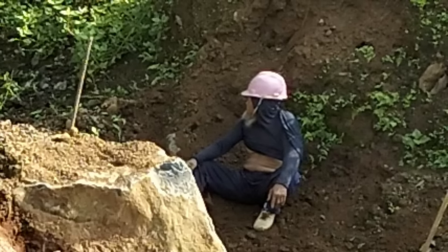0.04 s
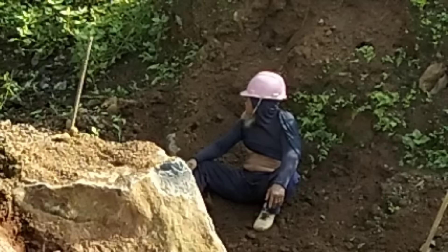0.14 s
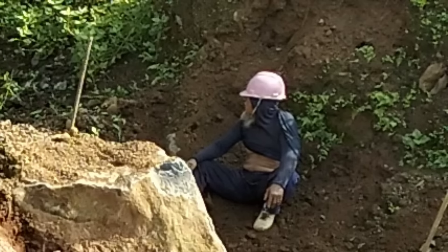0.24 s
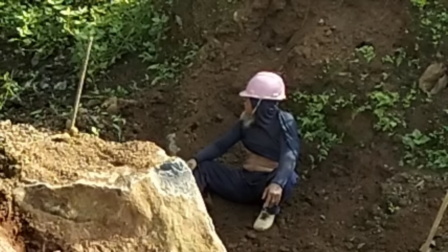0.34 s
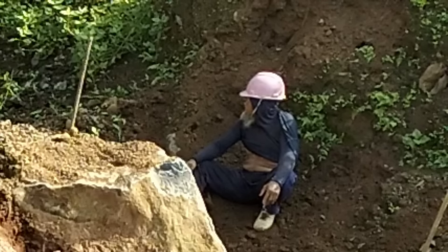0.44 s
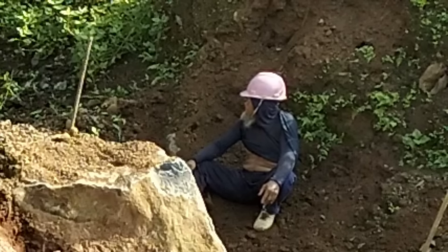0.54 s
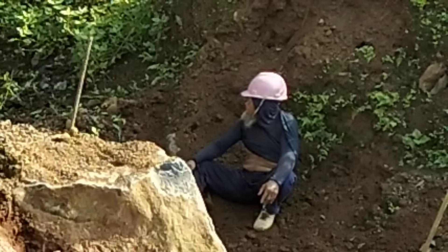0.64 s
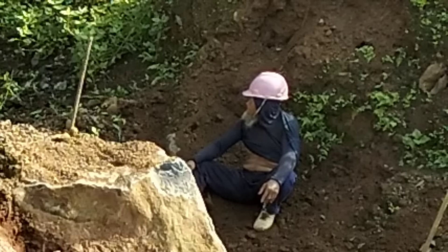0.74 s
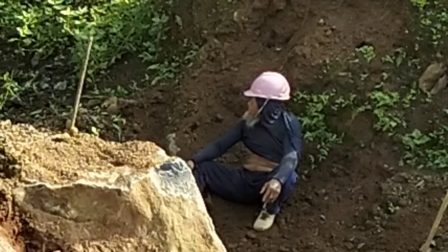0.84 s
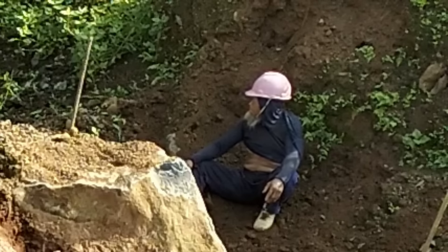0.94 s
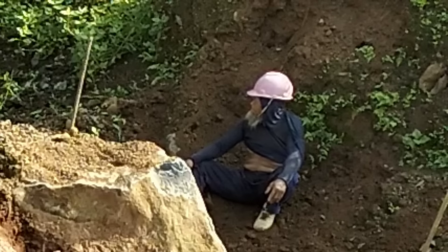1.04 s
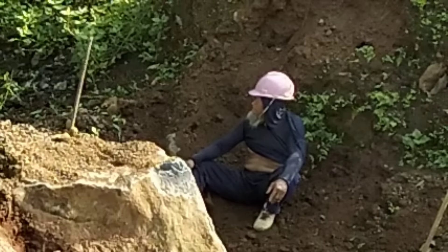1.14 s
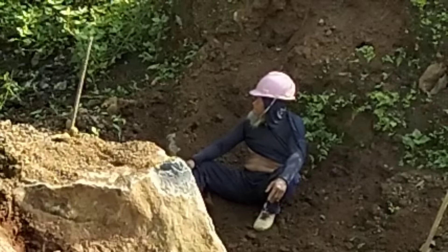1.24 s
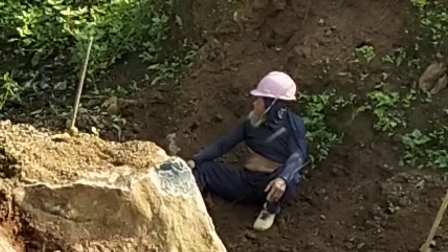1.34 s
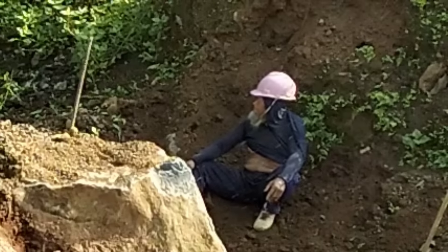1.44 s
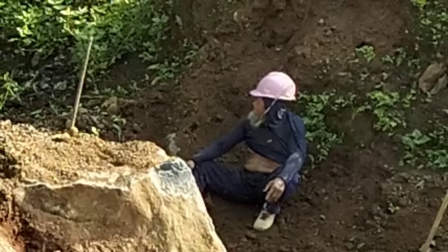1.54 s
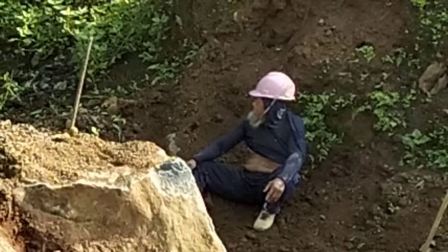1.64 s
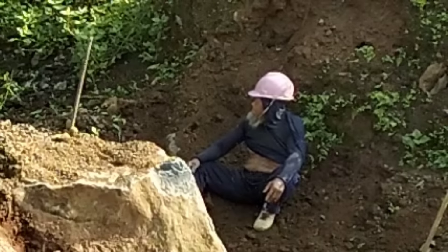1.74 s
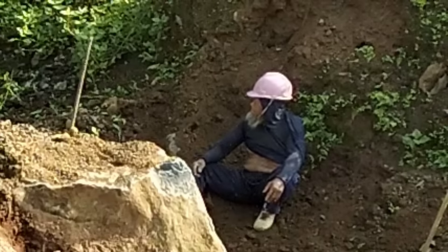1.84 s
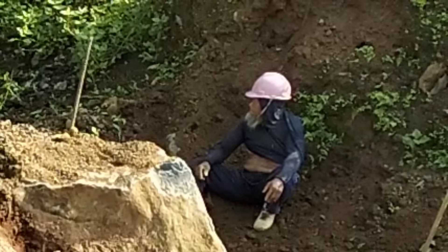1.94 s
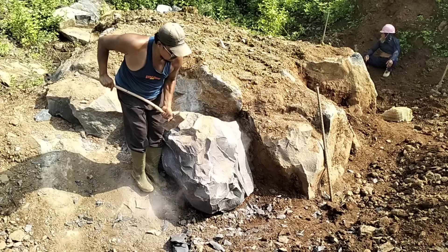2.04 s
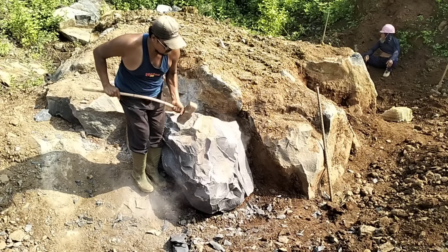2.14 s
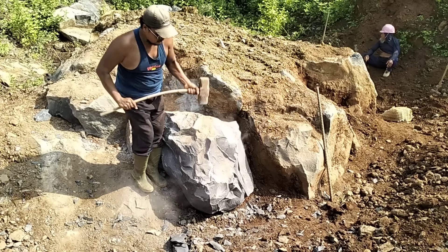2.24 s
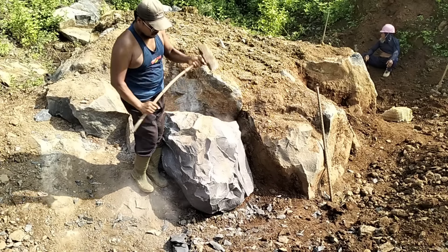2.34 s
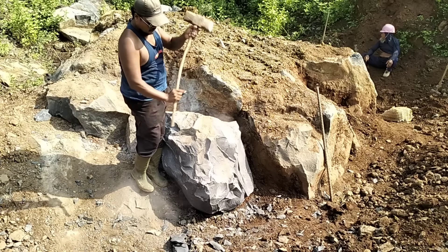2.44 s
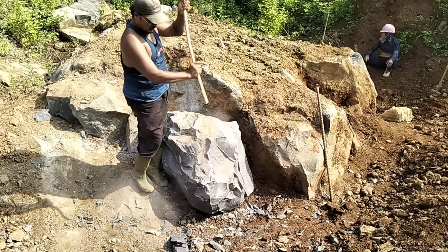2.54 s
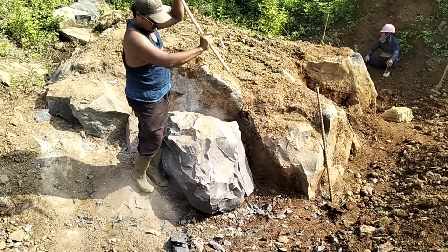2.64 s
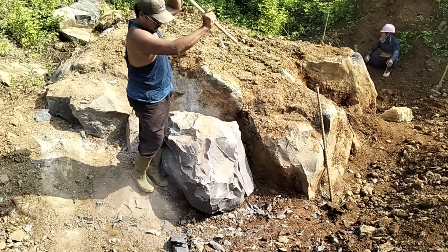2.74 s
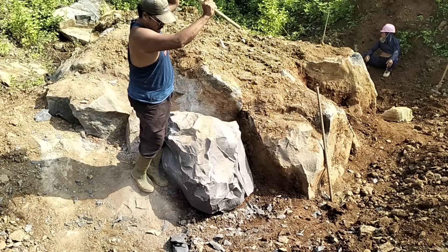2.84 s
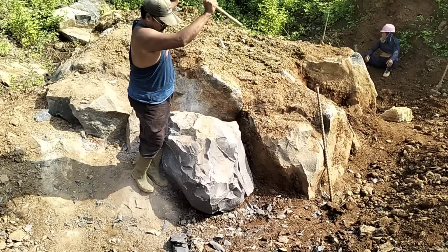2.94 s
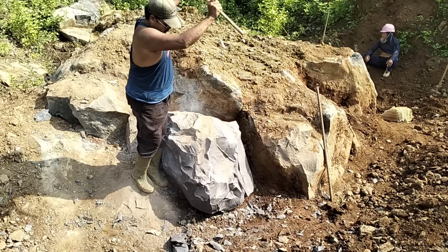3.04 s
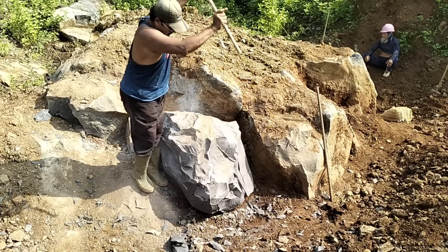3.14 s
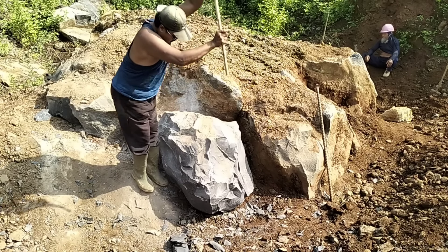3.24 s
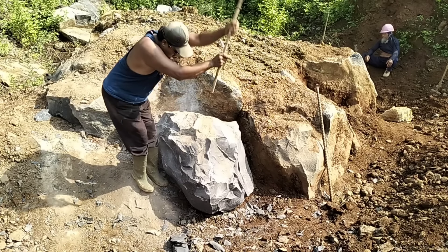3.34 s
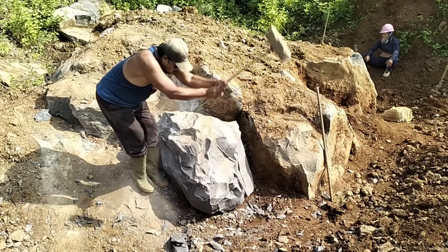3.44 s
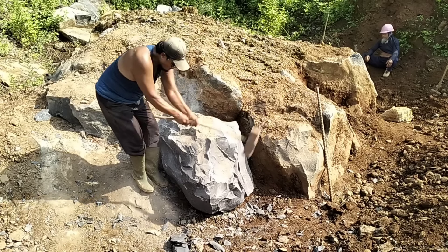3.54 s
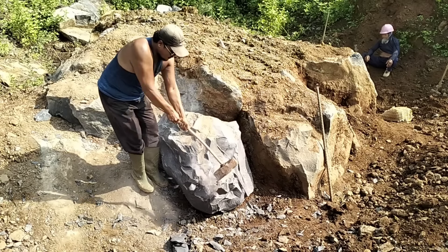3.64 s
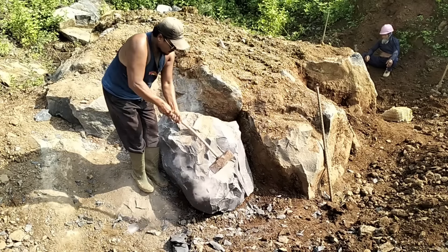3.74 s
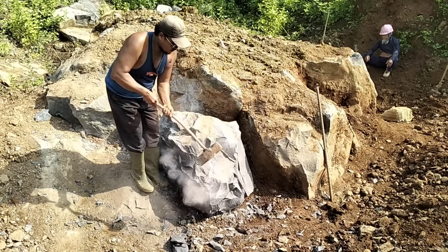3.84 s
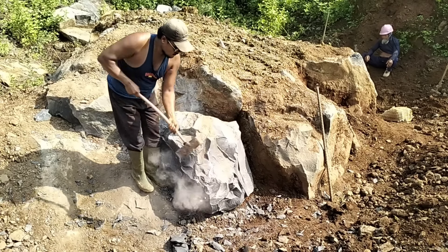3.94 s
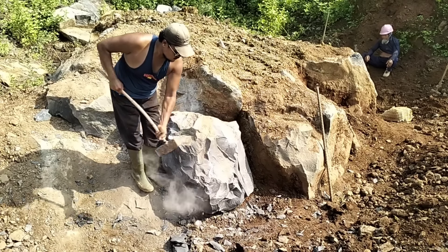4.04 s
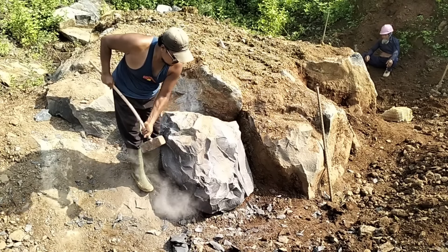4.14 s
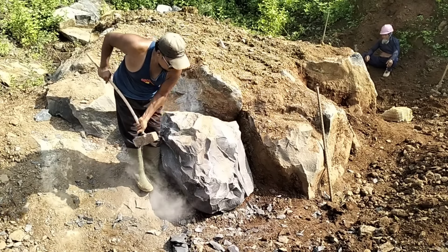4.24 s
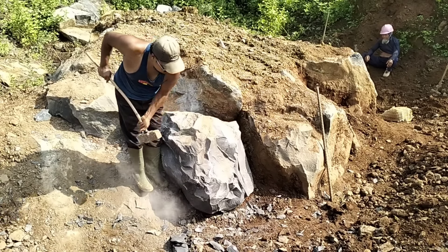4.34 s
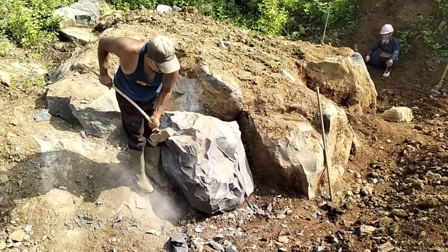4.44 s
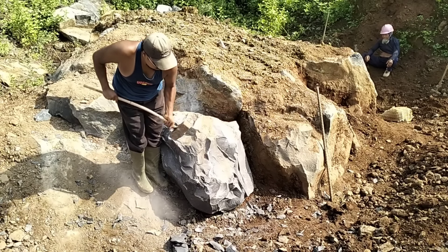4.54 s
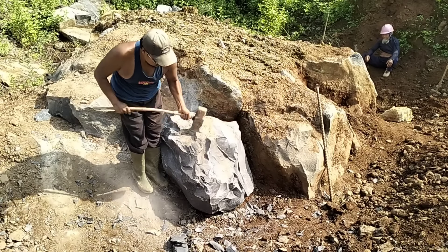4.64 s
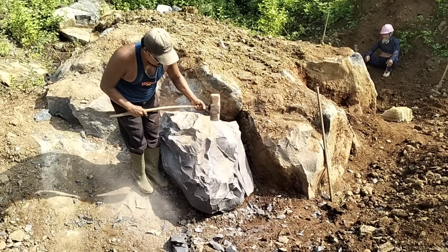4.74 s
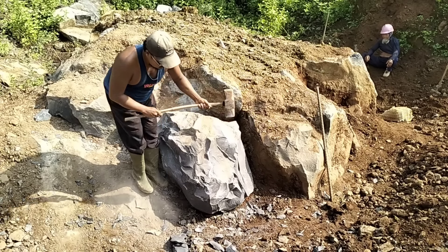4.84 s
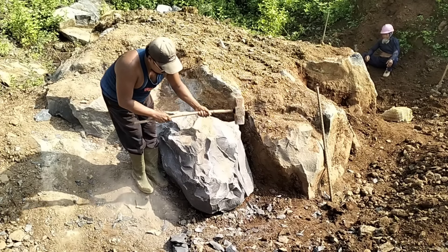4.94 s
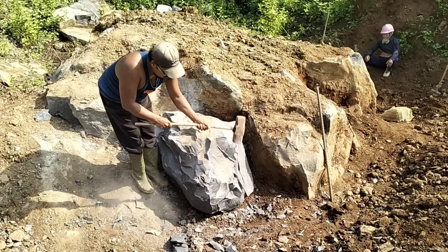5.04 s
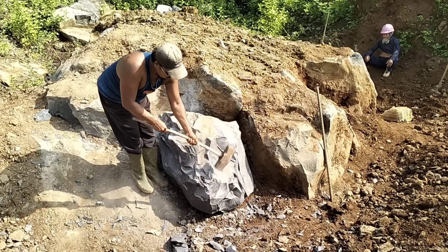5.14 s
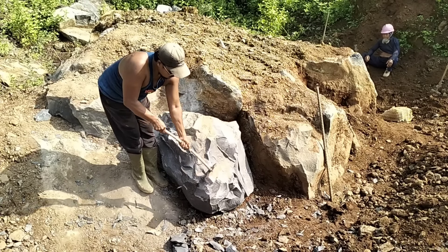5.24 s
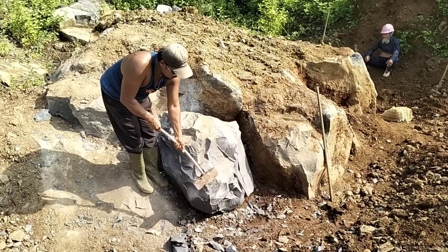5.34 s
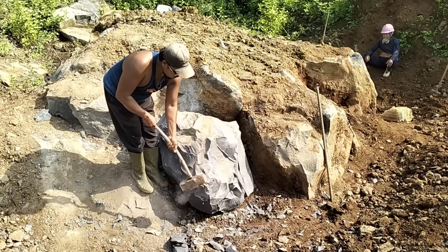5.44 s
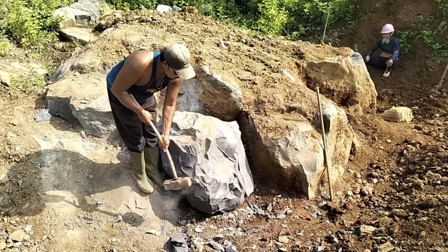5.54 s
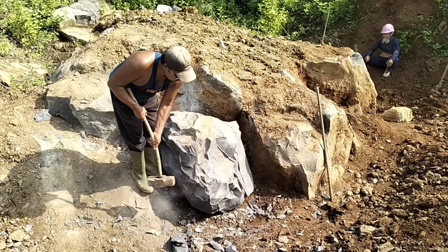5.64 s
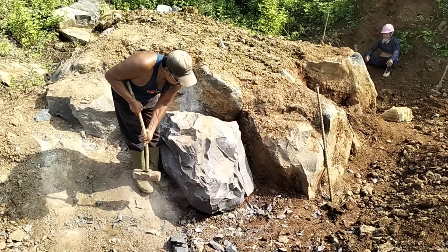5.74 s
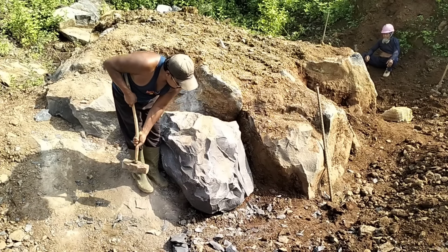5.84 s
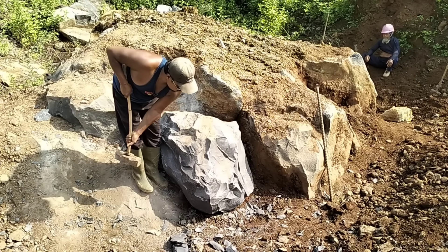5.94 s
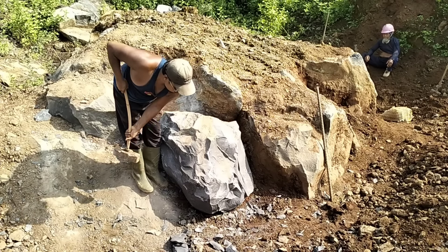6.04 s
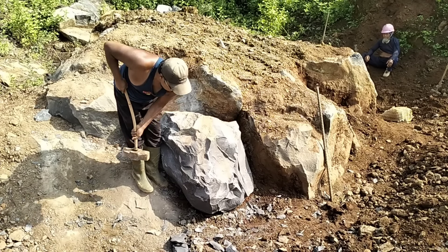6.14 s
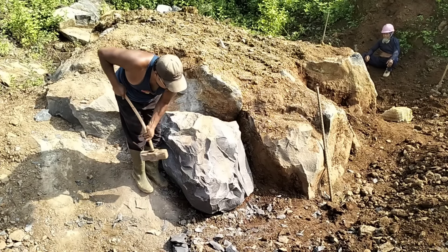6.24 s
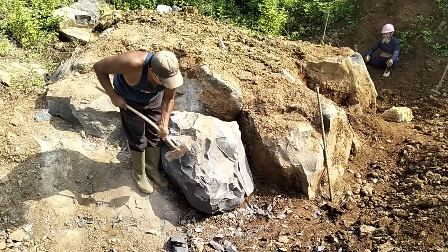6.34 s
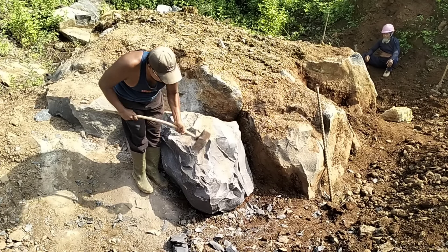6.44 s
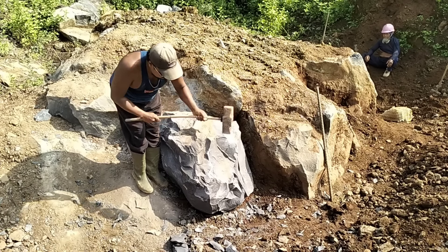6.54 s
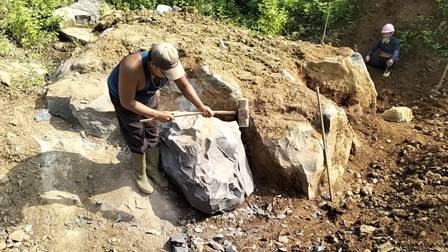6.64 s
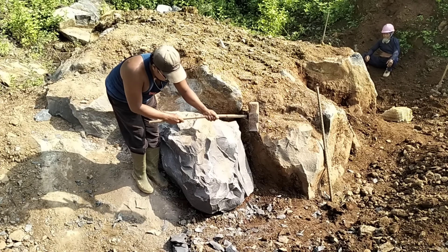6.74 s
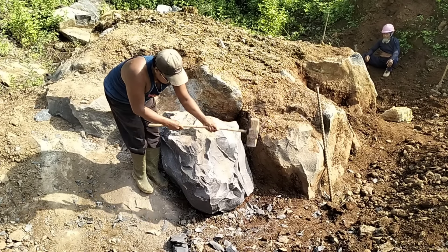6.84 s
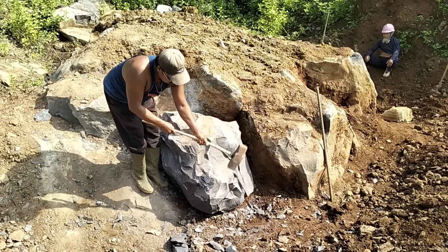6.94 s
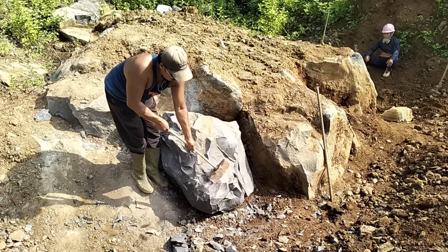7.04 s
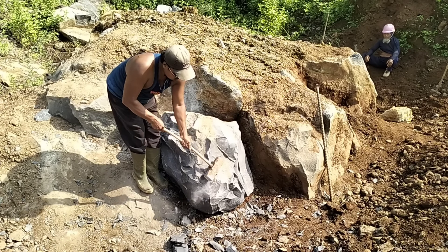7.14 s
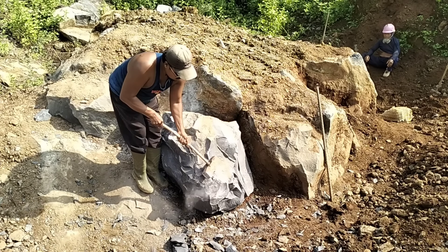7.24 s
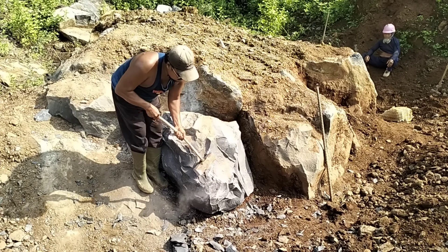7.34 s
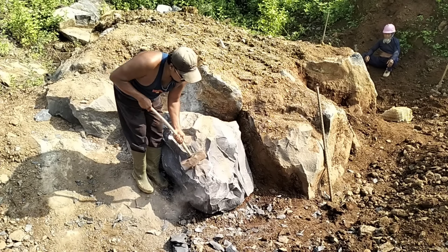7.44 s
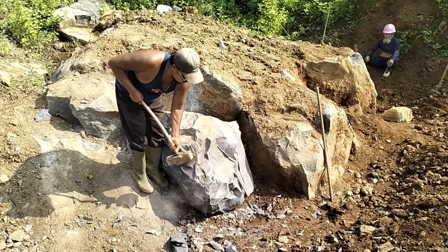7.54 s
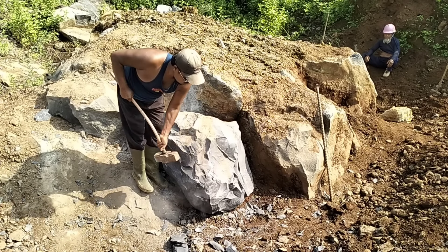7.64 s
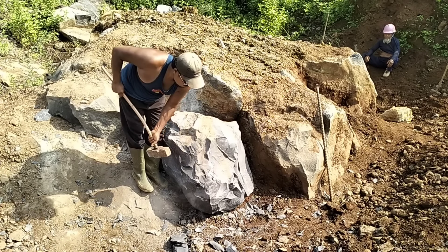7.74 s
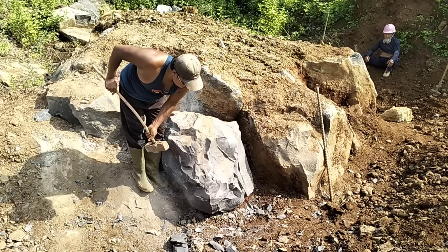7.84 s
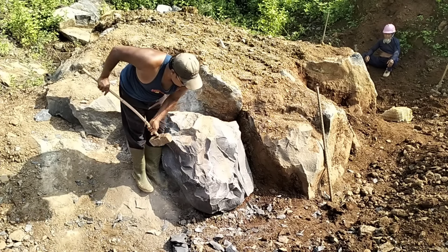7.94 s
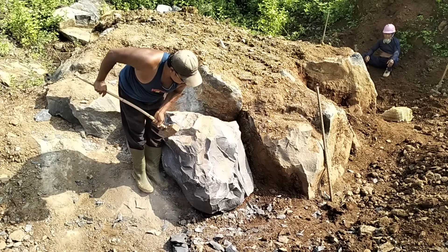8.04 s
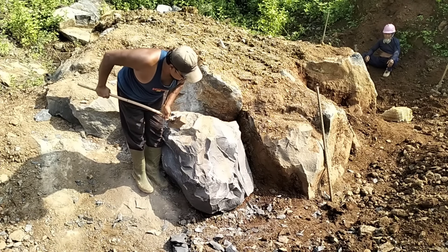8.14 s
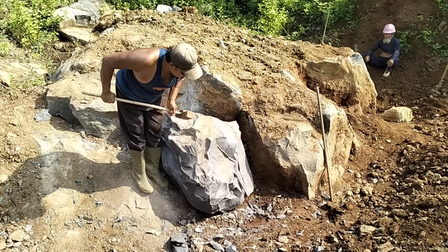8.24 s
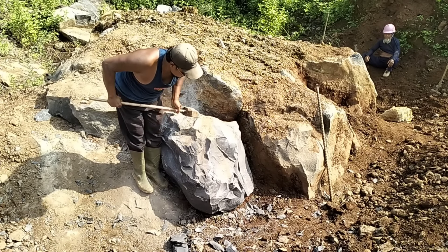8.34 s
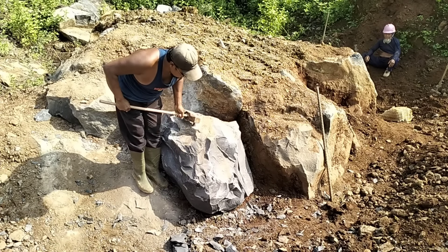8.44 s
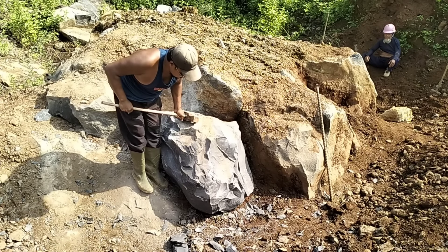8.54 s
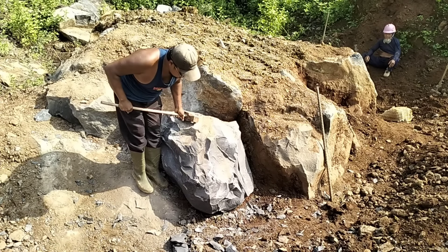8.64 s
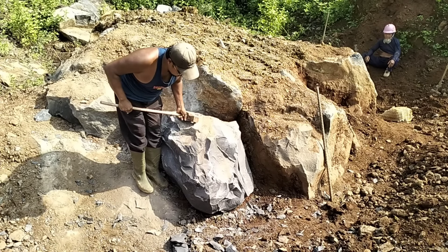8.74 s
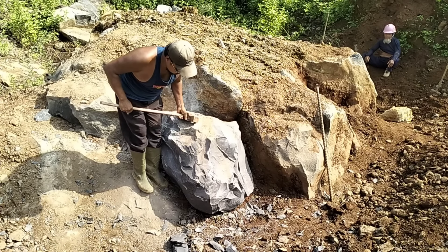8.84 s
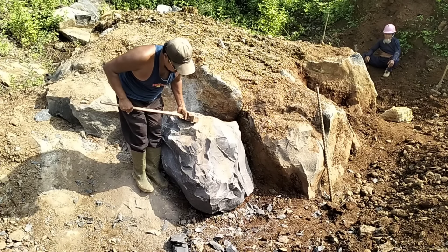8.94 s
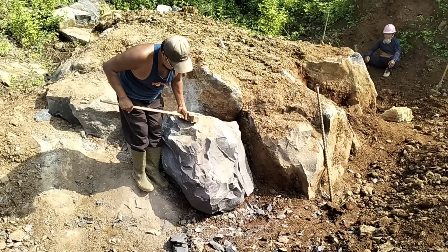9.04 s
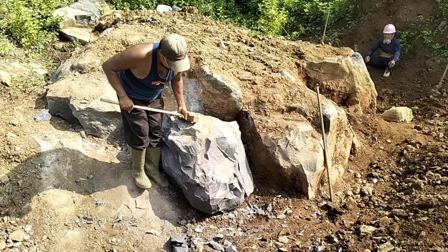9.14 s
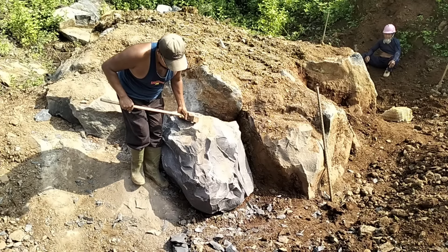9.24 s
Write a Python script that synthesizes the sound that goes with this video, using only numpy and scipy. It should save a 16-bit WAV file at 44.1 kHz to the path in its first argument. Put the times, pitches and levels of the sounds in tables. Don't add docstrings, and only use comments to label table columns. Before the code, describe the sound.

Six sharp sledgehammer blows crack a boulder in an open earth pit, debris rattling after, over steady high insect hiss and a faint bird.

```python
import sys
import numpy as np
from scipy import signal
from scipy.fft import rfft, irfft, next_fast_len
from scipy.io import wavfile
from scipy.ndimage import uniform_filter1d, map_coordinates

SR = 44100
rng = np.random.default_rng(int(sys.argv[2]) if len(sys.argv) > 2 else 0)


def volts_from_db(level):
    exponent = np.asarray(level, float) / 20
    return 10 ** exponent


def transcribe(signal):
    frames = np.atleast_2d(signal).T
    limited = np.clip(frames, -1, 1)
    pcm = np.round(limited * 32767).astype(np.int16)
    wavfile.write(sys.argv[1], SR, pcm)


N = 409688


def unit(x):
    return x / np.sqrt(np.mean(x ** 2) + 1e-20)


def along(points, hz):
    f, v = np.transpose(points)
    return np.interp(np.log(hz + 1), np.log(f + 1), v)


def curves(rows):
    s, *cols = np.transpose(rows)
    return [np.interp(np.arange(N) / SR, s, c) for c in cols]


def wobble(rate):
    knots = rng.standard_normal(int(N * rate / SR) + 4)
    return map_coordinates(knots, [np.arange(N) * rate / SR])


def filtered(x, response):
    n = x.shape[-1]
    m = next_fast_len(n + 8192)
    return irfft(rfft(x, m) * response(np.fft.rfftfreq(m, 1 / SR)), m)[..., :n]


def add(track, s, x):
    part = track[..., round(s * SR):][..., :x.shape[-1]]
    part += x[..., :part.shape[-1]]


def ring(modes, t, attack, lag=0):
    tones = sum(volts_from_db(db - 60 * t / t60) * np.sin(2 * np.pi * hz * t - lag) for hz, db, t60 in modes)
    return tones * (1 - np.exp(-t / attack))


def after_blows(shape, rows):
    t = np.arange(N) / SR
    return sum((t > s) * shape(np.maximum(t - s, 0), row) for (s, *_), row in zip(BLOWS, rows))


# (f/Hz, correlation -1..1)
LIKENESS = [(60, 0.84), (130, 0.92), (290, 0.22), (640, -0.013), (1390, -0.35), (3060, 0.21),
            (6720, -0.092), (14800, 0.094)]


def rush(spectrum, patchy_db):
    z = signal.stft(rng.standard_normal((2, N)), nperseg=512)[2]
    field = uniform_filter1d(rng.standard_normal(z.shape[1:]), size=8, axis=0)
    field = uniform_filter1d(field, size=6, axis=1)
    pair = signal.istft(z * volts_from_db(patchy_db * unit(field)), nperseg=512)[1][:, :N]

    def spread(hz):
        turn = np.arccos(np.clip(along(LIKENESS, hz), -1, 1)) / 2
        return volts_from_db(along(spectrum, hz)) * [np.cos(turn), np.sin(turn)]

    mid, side = filtered(pair, spread)
    return unit(np.array([mid + side, mid - side]))


# (f/Hz, t60/s)
PIT_DECAY = [(100, 0.76), (500, 0.12), (2000, 0.15), (8000, 0.21)]


def pit(x):
    hz, t, z = signal.stft(rng.standard_normal((2, SR // 2)), SR, nperseg=256)
    tail = signal.istft(z * volts_from_db(-60 * t / along(PIT_DECAY, hz)[:, None]), SR, nperseg=256)[1]
    return signal.fftconvolve(np.pad(x, (400, 0))[None], tail / np.linalg.norm(tail[0]), axes=1)


# (f/Hz, level/dB per Hz)
LOW_CHORUS = [(1120, -54), (1900, -21.5), (2370, -8), (2580, -5.5), (2790, -1), (3440, -2), (4700, 1.5),
              (5610, -1), (6820, -1.5), (7670, -9.5), (8200, -6.5), (10700, -37.5), (18000, -120)]
# (f/Hz, level/dB per Hz)
HIGH_CHORUS = [(4470, -31.5), (7600, -10), (8080, -10.5), (9530, 2), (11200, -0.5), (12600, -5.5),
               (14400, -14), (14800, -34), (14900, -66.5), (15200, -75)]
# (t/s, level/dB)
SWELLS = [(0, -35.5), (.22, -35.5), (.5, -33), (.85, -34.5), (1.25, -33), (2.0, -34), (2.9, -32),
          (3.35, -33.5), (3.62, -32), (4.5, -31.5), (4.8, -33.5), (5.2, -32), (6.4, -33.5), (6.8, -33.5),
          (7.6, -31.5), (8.05, -35), (8.55, -33), (9.29, -34)]


def insects():
    high_db, = curves(SWELLS)
    low_db = -31 + 0.16 * (high_db - high_db.mean()) + 0.26 * wobble(2.5)
    throb = np.sin(2 * np.pi * np.cumsum(24.5 + 2.0 * wobble(3.1)) / SR)
    low = volts_from_db(low_db + 0.43 * wobble(30)) * rush(LOW_CHORUS, patchy_db=0.85)
    high = volts_from_db(high_db + .9 * throb + 0.21 * wobble(40)) * rush(HIGH_CHORUS, patchy_db=1.46)
    return low * volts_from_db([[-.1], [.1]]) + high * volts_from_db([[-1.3], [1.3]])


# (f/Hz, level/dB per Hz)
RUMBLE_TONE = [(12, -62.5), (20, -31), (29, -12), (42, -19), (59, -2), (91, -7), (130, -1), (300, -30.5),
               (390, -54.5), (660, -120)]
# (t/s, level/dB)
DISTANT = [(0, -52.5), (.45, -55), (.75, -52), (1.6, -52), (2.3, -51.5), (3.4, -52.5), (5.2, -52),
           (5.7, -56.5), (6.05, -54), (7.9, -57.5), (9.29, -56)]
# t/s, length/s, level/dB
ROLL = (7.27, 0.29, -45)


def rumble():
    distant_db, = curves(DISTANT)
    s, length, db = ROLL
    place = (np.arange(N) / SR - s) / length
    roll = volts_from_db(db) * np.clip(1.6 - np.abs(place * 3.0 - 1.6), 0, 1)
    return (volts_from_db(distant_db) + roll) * volts_from_db(2.2 * wobble(4)) * rush(RUMBLE_TONE, patchy_db=0.5)


# (f/Hz, level/dB per Hz)
AIR_TONE = [(130, -31.5), (220, -4.5), (308, -4), (425, -6.5), (884, -8.5), (978, -8.5), (1650, -7.5),
            (2140, -34), (3630, -120)]
# (level/dB, t60/s)
DUST = [(-51.5, 0.73), (-45, 1.3), (-56, 0.7), (-52.5, 0.91), (-47, 0.65), (-67, .8)]
# (centre t/s, length/s, level/dB)
STIRS = [
    (1.153, 0.359, -66),
    (1.896, 0.65, -65.5),
    (6.028, 0.22, -64),
]


def air():
    t = np.arange(N) / SR
    dust = after_blows(lambda since, row: volts_from_db(row[0] - 60 * since / row[1]), DUST)
    breeze = sum(volts_from_db(db) * np.exp(-(2.8 * (t - s) / length) ** 2) for s, length, db in STIRS)
    level = volts_from_db(-61 + 1.1 * wobble(3)) + dust + breeze
    return level * volts_from_db(1.2 * wobble(23)) * rush(AIR_TONE, patchy_db=4)


# (t/s, length/s, level/dB)
TRILL = [(.68, .045, -56), (.72, .05, -54), (.768, .06, -52), (.828, .045, -57.5), (.885, .04, -59.5),
         (.918, .035, -56), (3.345, .045, -56.5), (3.38, .045, -57), (3.43, .045, -52.5), (3.488, .04, -54),
         (3.525, .035, -59.5), (3.572, .045, -58), (5.825, .035, -61), (5.853, .05, -54), (5.913, .04, -52),
         (5.968, .045, -56), (6.045, .045, -51)]
# (phrase t/s, level/dB)
PHRASES = [
    (0.68, -55.5),
    (3.335, -59),
    (5.84, -56),
]
# (t/s after its start, length/s, top f/Hz, cut under the phrase level/dB)
FLICKS = [
    (.325, .07, 1160, 0),
    (.395, .03, 1100, 4),
    (.435, .08, 1125, 5),
    (.55, .085, 1150, 0),
]


def bird():
    out, waver = np.zeros(N), wobble(40)

    def note(s, length, pitch_hz, rise, db):
        u = np.linspace(0, 1, round(length * SR))
        arch = rise * (u / .55 - 1) ** 2
        pitch = pitch_hz * (1 - arch + .015 * waver[round(s * SR):][:len(u)])
        swell = np.abs(np.sin(np.pi * u)) ** 0.54
        add(out, s, volts_from_db(db) * swell * np.sin(2 * np.pi * np.cumsum(pitch) / SR))

    for s, length, db in TRILL:
        note(s, length, pitch_hz=1050, rise=.025, db=db)
    for s, db in PHRASES:
        for late, length, top_hz, under_db in FLICKS:
            note(s + late, length, top_hz, rise=.12, db=db - under_db)
    return out * volts_from_db(1.5 * wobble(30)) + volts_from_db(-7.5) * pit(out)[:, :N]


# (crushing late t/s, steel decay ratio, swish before it level/dB)
LANDINGS = [(.0003, 1.1, -25.5), (.0003, 1.15, -25), (.0026, 0.87, -36.5), (.0003, .8, -33.5),
            (.0004, 0.78, -30.5), (.0003, .8, -48)]


def swish():
    out, before = np.zeros((2, N)), np.arange(SR // 40)[::-1] / SR
    for (s, *_), (*_, db) in zip(BLOWS, LANDINGS):
        noise = rng.standard_normal(len(before))
        stirred = unit(filtered(noise, lambda hz: volts_from_db(along(CRUMB_TONE, hz))))
        add(out, s - len(before) / SR, volts_from_db(db - 60 * before / 0.037) * stirred)
    return out


# (f/Hz, trim level/dB, t60/s, family)
STEEL = [(5322, 0, .14, 0), (5346, -4, .14, 0), (6352, -5, .25, 1), (6380, 0, .25, 1), (6872, 0, .15, 2),
         (8628, 0, .12, 3), (8666, -2, .12, 3), (9292, 0, .17, 4), (9362, -1, .17, 4), (11168, -2, .17, 5),
         (11231, 0, .17, 5), (13895, -2, .14, 1), (9325, -9, .1, 4), (10480, -9, .1, 5),
         (10710, -5, .075, 5), (11850, -5, .075, 5), (12370, -6, .09, 5)]


def steel(faces, t, damp):
    hz, trim_db, t60, family = np.transpose(STEEL)[:, :, None, None]
    lean, turn = rng.uniform(-1, 1, (2, len(STEEL), 1, 1)) * np.array([[-1], [1]])
    wander = signal.detrend(np.cumsum(rng.standard_normal(len(t) // 4))) * 3e-7
    clock = t + np.pad(wander, (0, len(t) - len(wander)), mode="edge")
    flutter_db = 1.5 * signal.resample(rng.standard_normal((len(STEEL), 1, 40)), len(t), axis=-1)
    struck_db = np.array(faces)[family.astype(int)] + trim_db
    level = volts_from_db(struck_db + 3 * lean + flutter_db - 60 * t / (damp * t60))
    tones = np.sum(level * np.sin(2 * np.pi * hz * clock + .65 * turn), axis=0)
    return tones * (1 - np.exp(-t / .007)) ** 2


# (t/s, peak level/dB, crushing grit level/dB, contact/s, ground thump level/dB)
BLOWS = [
    (1.3402, 0, -12, 0.0074, -2.5),
    (3.7172, 4.5, -19, 0.0035, -7.5),
    (5.2968, -2.5, 1.5, 0.0085, -5.5),
    (5.3551, 1.5, -20, 0.0037, -19),
    (7.156, -3, 0, 0.0046, 0),
    (8.6042, -5, -17.5, 0.0044, -4.5),
]
# (f/Hz, level/dB, t60/s)
SPOTS = [
    [(580, -8, 0.067), (718, -6, 0.04), (1089, -6.5, 0.021), (1400, -9, 0.048), (1630, -4, 0.018),
     (3247, -14, 0.085), (3920, -15, 0.11), (4487, -26.5, .09), (2616, -15, 0.012)],
    [(600, -4, 0.02), (1100, 4, 0.015), (1400, -4.5, 0.011), (1800, 0, 0.022), (740, -7, 0.014),
     (2440, -19, .02), (3010, -23, 0.071), (4080, -24.5, 0.0086)],
    [(550, -1, 0.025), (1500, -10.5, .02), (1990, -10.5, 0.031), (2486, -8.5, 0.04), (4155, -10.5, 0.027),
     (7540, -10.5, 0.01)],
    [(595, -7.5, 0.026), (1170, -7.5, 0.02), (1400, -7, 0.065), (1720, -10.5, 0.074), (1773, -2, 0.028),
     (2030, -11, 0.02)],
    [(380, -4, 0.067), (525, -1, .025), (1420, -11.5, 0.034), (1720, -3, 0.031), (2530, -23, 0.013),
     (3112, -13.5, 0.018)],
    [(524, -4.5, 0.033), (819, -2, 0.037), (1100, 0.5, 0.031), (1347, -9.5, 0.04), (2365, -11.5, 0.03),
     (3080, -17, 0.072)],
]
# (t/s after contact, push)
BITES = [
    [(0, .9), (.0027, .55), (.0047, .4), (.0069, .5)],
    [(0, 0.89), (.0014, .4), (.0029, .35), (.0044, 0.36)],
    [(0, .9), (.0023, .6), (.0042, 0.46), (.0062, .45)],
    [(0, 0.98), (.0023, .5)],
    [(0, .9), (.0017, .5), (.0036, .4)],
    [(0, -1.02), (.0032, -0.25), (.0075, 0.22)],
]
RINGING = [(-16, -28, -14, -13, -6, -18), (-18, -21, -20, -21, -19, -26), (-25, -31, -32, -38, -36, -34),
           (-22, -34, -36, -46, -38, -42), (-20, -21, -28, -15, -23, -29), (-30, -39, -30, -38, -39, -31)]
# (f/Hz, level/dB per Hz)
GRIT_TONE = [(180, -32.5), (300, 0.5), (1340, -5), (1980, -1.5), (7510, -11.5), (8700, -12), (10600, -11),
             (14200, -16), (15200, -40)]
# delay t/s, level/dB
WALL_SLAP = (.081, -17)


def crack(spot, bites, contact, pressed, rise_s):
    t = np.arange(len(pressed)) / SR
    fractures = rng.standard_normal(len(t)) ** 3 * pressed
    chatter = fractures * 0.17 / np.sqrt(15 * contact * SR)
    for after, push in bites:
        chatter[max(round(after * SR), 0)] = push
    mono = signal.fftconvolve(chatter, ring(spot, t, attack=rise_s))[:len(t)]
    lagging = np.pad(mono, (3, 0))[:len(t)]
    return np.array([mono, lagging]) * volts_from_db([[.3], [-.3]])


def grit(db, pressed, late, rise_s):
    t = np.arange(len(pressed)) / SR
    mid, side = unit(filtered(rng.standard_normal((2, len(t))), lambda hz: volts_from_db(along(GRIT_TONE, hz))))
    bits_db = 4.5 * unit(uniform_filter1d(rng.standard_normal(len(t)), size=24))
    onset = np.clip((t - late) / rise_s + 1, .03, 1)
    return volts_from_db(db - 2.5 + bits_db) * pressed * onset * (0.73 * mid + .5 * side * [[1], [-1]])


def hammer():
    out, t = np.zeros((2, N)), np.arange(SR // 2) / SR
    rise_s = .00025
    slap_s, slap_db = WALL_SLAP
    for blow, spot, bites, faces, (late, damp, _) in zip(BLOWS, SPOTS, BITES, RINGING, LANDINGS):
        s, db, grit_db, contact, _ = blow
        pressed = volts_from_db(-60 * np.maximum(t - contact, 0) / 0.015)
        stone = crack(spot, bites, contact, pressed, rise_s)
        knock = volts_from_db(db) * (stone + grit(grit_db, pressed, late, rise_s))
        head = volts_from_db(1.6) * steel(faces, t, damp)
        stone_answer = volts_from_db(-14.5) * pit(knock[0] * volts_from_db(-60 * t / 0.025))[:, :len(t)]
        steel_answer = volts_from_db(-16.5) * pit(head[0])[:, :len(t)]
        add(out, s, knock + head + stone_answer + steel_answer)
        add(out, s + slap_s, volts_from_db(slap_db) * (head + volts_from_db(-16.5) * pit(knock[0])[:, :len(t)]))
    return out


# (level/dB, t60/s)
CRUMBS = [(-20.5, 0.38), (-21.5, 0.42), (-33, 0.11), (-31, 0.2), (-23, 0.16), (-32, 0.16)]
# (f/Hz, level/dB per Hz)
CRUMB_TONE = [(120, -10.5), (300, -0.5), (800, -6), (1600, -5.5), (2600, -10), (5000, -18.5), (9000, -40)]


def crumbs():
    out, t = np.zeros((2, N)), np.arange(SR // 2) / SR
    for (s, *_), (db, t60) in zip(BLOWS, CRUMBS):
        spikes = rng.standard_normal((2, len(t))) * volts_from_db(4.3 * rng.standard_normal(len(t)))
        mid, side = unit(filtered(spikes, lambda hz: volts_from_db(along(CRUMB_TONE, hz))))
        shower = volts_from_db(db - 60 * t / t60) * (1 - np.exp(-t / 0.0048))
        add(out, s, shower * (mid + .4 * side * [[1], [-1]]))
    return out


# (t/s, peak level/dB, f/Hz, t60/s)
LUMPS = [
    (4.032, -32.5, 350, 0.12),
    (4.449, -34.5, 423, 0.034),
    (4.689, -38.5, 487, 0.089),
    (7.24, -35, 590, 0.19),
    (7.394, -28.5, 600, 0.043),
    (7.455, -40, 700, 0.059),
]
# (t/s, peak level/dB, f/Hz, t60/s)
GRAVEL = [(7.1668, -11.5, 8500, .025), (7.1685, -14, 2200, .02), (1.3465, -14.5, 1500, 0.016),
          (3.535, -47, 548, .17), (3.795, -24, 1100, 0.19), (3.884, -35.5, 1216, .14),
          (4.052, -37, 892, .15), (4.124, -38, 700, 0.046), (5.055, -39.5, 1400, 0.031),
          (5.43, -38.5, 900, 0.065), (7.494, -35.5, 1500, .052), (7.556, -23, 1100, .05),
          (7.705, -40, 1100, .03), (7.732, -31.5, 1240, 0.029), (7.832, -26, 910, 0.037)]
# (t/s, peak level/dB, f/Hz, t60/s)
CHIPS = [(1.80, -45, 502, 0.038), (1.946, -44, 450, 0.081), (1.948, -43, 986, 0.077),
         (3.575, -56, 650, .064), (1.346, -11.5, 3000, 0.033), (1.3525, -14, 3950, .04),
         (1.343, -17, 3400, 0.041), (8.611, -22, 3080, .025), (8.626, -30, 1400, .04),
         (4.095, -40, 550, .05), (4.204, -26, 2250, 0.079), (6.5, -42.5, 620, .05),
         (4.817, -40, 280, 0.071), (4.996, -45, 1700, 0.019), (5.028, -37, 520, 0.053),
         (5.1, -37.5, 530, 0.068), (7.167, -13.5, 1552, 0.069), (7.5484, -8.5, 1970, 0.01),
         (4.0312, -20, 510, 0.021)]
# (t/s, peak level/dB, f/Hz, t60/s)
KNOCKS = [
    (7.5575, -13, 467, 0.034),
    (7.841, -26.5, 406, 0.07),
]
# (t/s, peak level/dB, f/Hz, t60/s)
SPLINTERS = [
    (4.068, -30, 3770, .27),
    (4.206, -21, 12700, 0.034),
    (4.208, -15, 12200, .03),
    (4.228, -24, 3760, 0.058),
    (7.236, -22, 9530, 0.041),
]
# (t/s, peak level/dB, f/Hz, t60/s)
TICKS = [
    (1.3400, 1.5, 2400, .004),
    (3.7133, -7, 780, .009),
    (4.0321, -4.5, 2900, .0045),
    (4.054, -19, 2500, .006),
    (5.3547, -3, 5300, .005),
    (5.3549, -6, 3300, .006),
    (7.5445, -9, 1700, .006),
    (7.5524, -4, 2600, .003),
    (7.5551, -4, 2900, .003),
]


def flakes():
    out, t = np.zeros((2, N)), np.arange(SR // 4) / SR

    def scatter(rows, q, thud_db, clear):
        for s, db, hz, t60 in rows:
            def tone(f):
                band = 1j * f * hz / q
                return (band / (hz * hz - f * f + band)) ** 2

            rattle = unit(filtered(rng.standard_normal(len(t)), tone))
            note = np.sin(2 * np.pi * hz * t)
            body = np.sqrt(1 - clear) * rattle + np.sqrt(clear) * note
            body = body * volts_from_db(-60 * t / t60) * (1 - np.exp(-t / 0.00045))
            hit = volts_from_db(db) * (body + volts_from_db(thud_db) * ring(GROUND, t, attack=0.011))
            add(out, s, hit * volts_from_db([[.5], [-.5]]) + volts_from_db(-19.0) * pit(hit)[:, :len(t)])

    scatter(LUMPS, q=.45, thud_db=-6, clear=0)
    scatter(GRAVEL, q=.75, thud_db=-26, clear=0)
    scatter(CHIPS, q=2.1, thud_db=-32, clear=.55)
    scatter(KNOCKS, q=1, thud_db=-10, clear=.45)
    scatter(SPLINTERS, q=30, thud_db=-40, clear=1)
    scatter(TICKS, q=.6, thud_db=-40, clear=.9)
    return out


# (f/Hz, level/dB, t60/s)
GROUND = [(75, -16, 0.084), (113.8, 2, .14), (130, -7.5, 0.066), (149.3, -9.5, 0.15), (184, -11, 0.11),
          (309, -8, 0.049)]
# (delay t/s, pitch ratio, decay ratio, deep boom level/dB)
THUMPS = [(.0069, .95, 1.0, -5), (.0082, 1.0, 1.0, -10), (.0054, 1.0, .8, -18), (.0067, 1.0, .9, -18),
          (.0086, 1.06, .85, -16), (.0072, 1.0, 1.15, -20)]
# f/Hz, t60/s
BOOM = (67, .13)


def ground():
    out, t = np.zeros((2, N)), np.arange(SR // 2) / SR
    no_push = lambda hz: (1j * hz / (55 + 1j * hz)) ** 3
    boom_hz, boom_t60 = BOOM
    for (s, db, _, _, thump_db), (wait, tune, last, boom_db) in zip(BLOWS, THUMPS):
        soil = [(tune * hz, level_db, last * t60) for hz, level_db, t60 in GROUND]
        soil.append((boom_hz, boom_db, boom_t60))
        thump = volts_from_db(db + thump_db) * filtered(ring(soil, t, attack=0.0031, lag=1.4), no_push)
        add(out, s + wait, thump + volts_from_db(-19.5) * pit(thump)[:, :len(t)])
    return out


# delay t/s, f/Hz, level/dB
PUFF = (.0117, 56, -1.5)


def puff():
    out = np.zeros((2, N))
    wait, hz, db = PUFF
    u = np.linspace(0, 1, round(SR / hz))
    push = -volts_from_db(db) * np.sin(2 * np.pi * u) * np.sqrt(np.abs(np.sin(np.pi * u)))
    push = np.pad(push, (0, SR // 20))
    add(out[1], BLOWS[0][0] + wait, filtered(push, lambda f: 1j * f / (30 + 1j * f)))
    return out


def scene():
    surroundings = insects() + rumble() + air() + bird()
    return surroundings + swish() + hammer() + crumbs() + flakes() + ground() + puff()


def top_cut(x):
    return signal.sosfilt(signal.butter(12, 15360, fs=SR, output="sos"), x)


DUCK_DB = [3.6, 6.4, 1.2, 1.2, 1.5, 1]


def record(dry):
    attack_s, release_s = 0.043, 0.33
    dip = lambda t, db: db * (1 - np.exp(-t / attack_s)) * np.exp(-t / release_s)
    ducked = dry * volts_from_db(-1.5 * after_blows(dip, DUCK_DB))
    dull = filtered(ducked, lambda hz: 1 / (1 + (hz / 14500) ** 40))
    flattened = dull / (1 + np.abs(dull / 1.01) ** 12) ** (1 / 12)
    finished = filtered(flattened, lambda hz: .1 + .9 / (1 + (hz / 14700) ** 40))
    return top_cut(finished)


dry = scene()
out = record(dry)
transcribe(out)
```